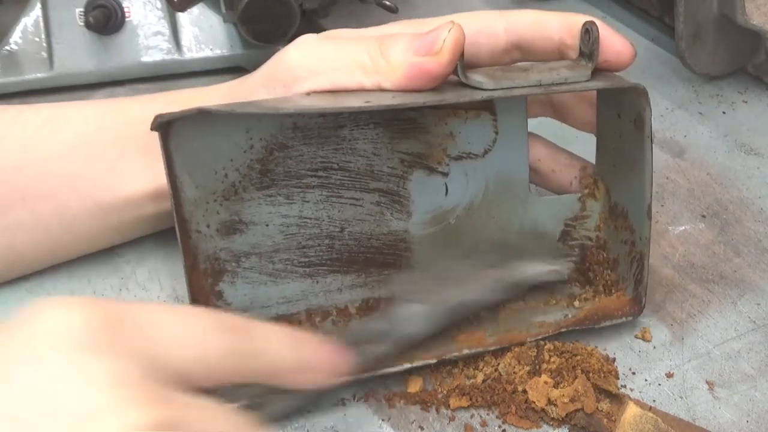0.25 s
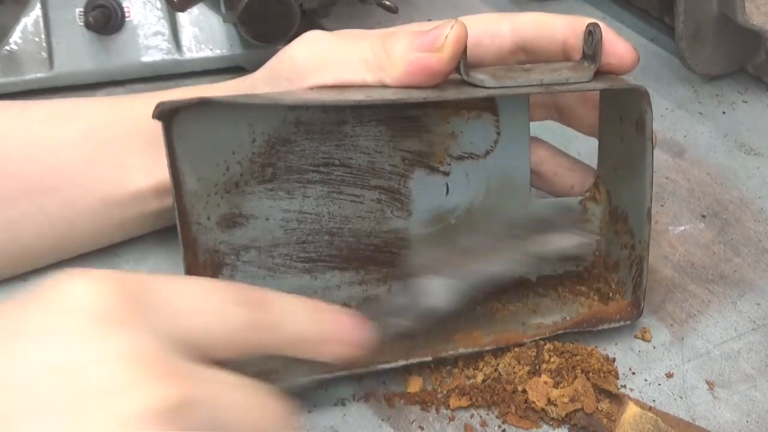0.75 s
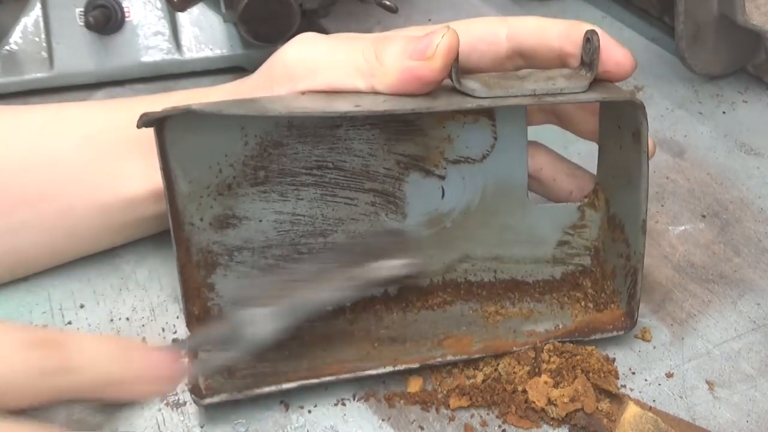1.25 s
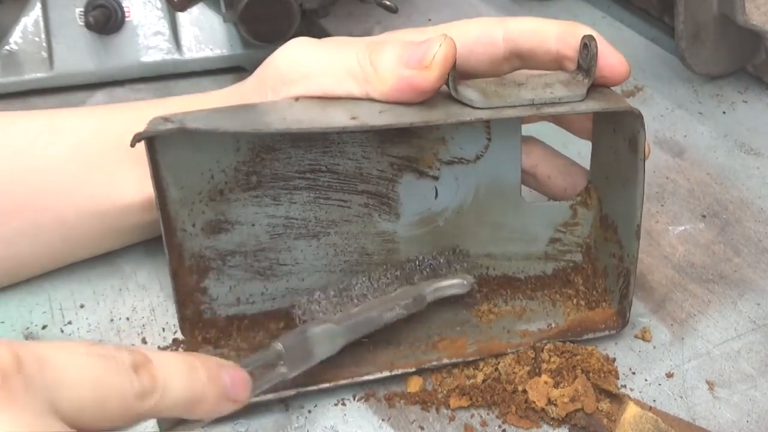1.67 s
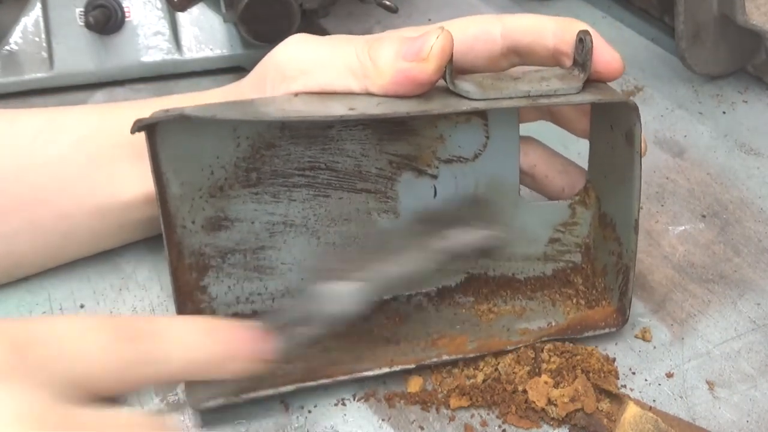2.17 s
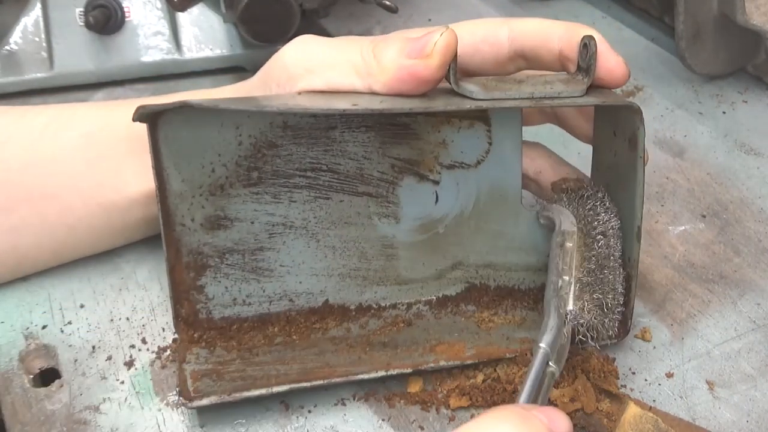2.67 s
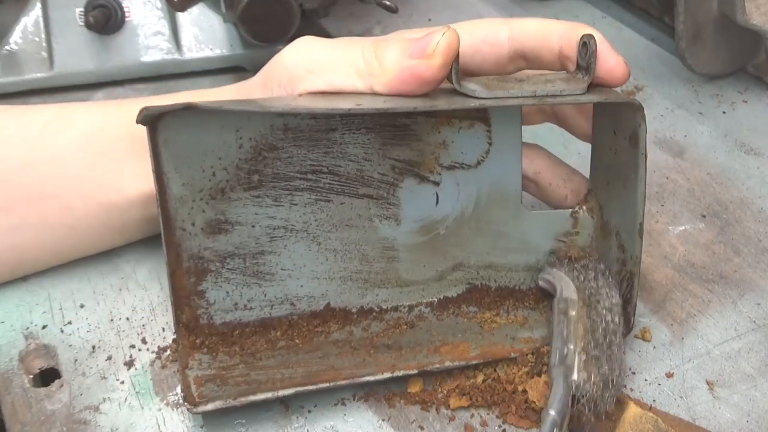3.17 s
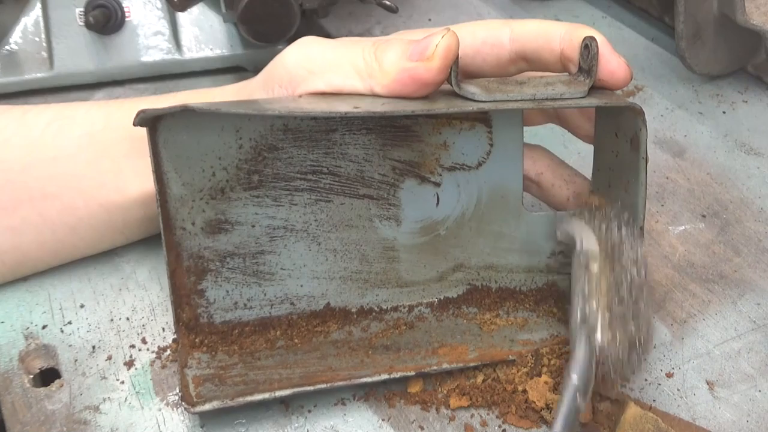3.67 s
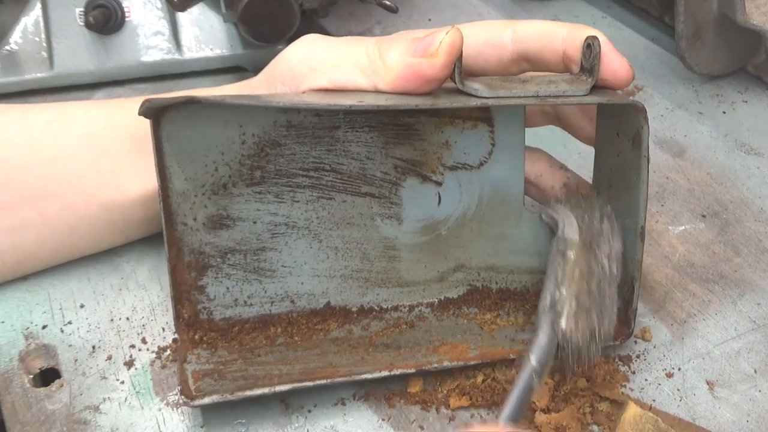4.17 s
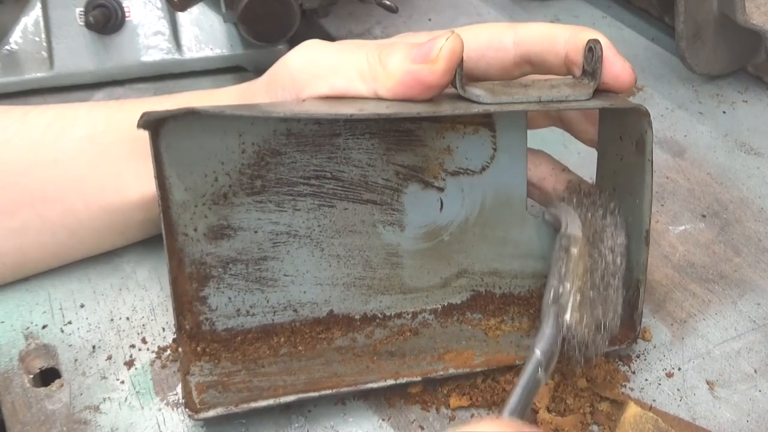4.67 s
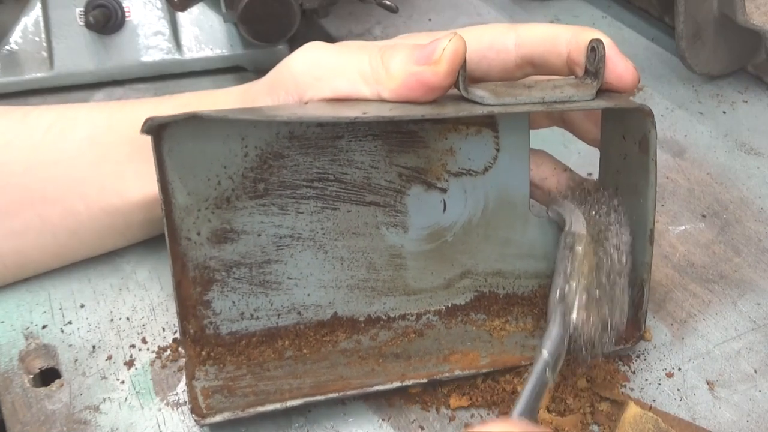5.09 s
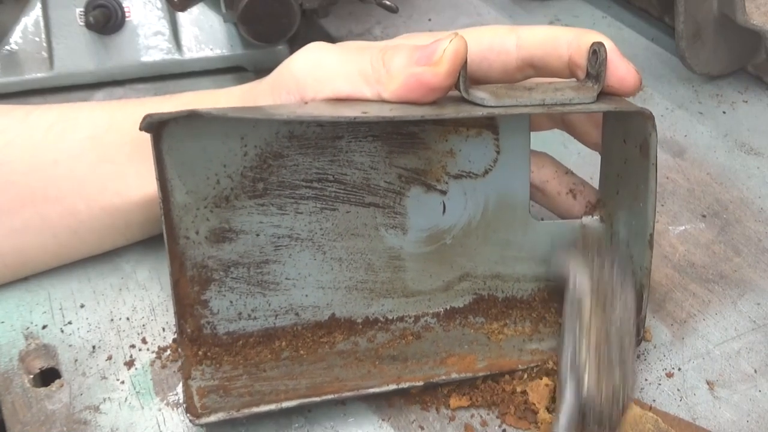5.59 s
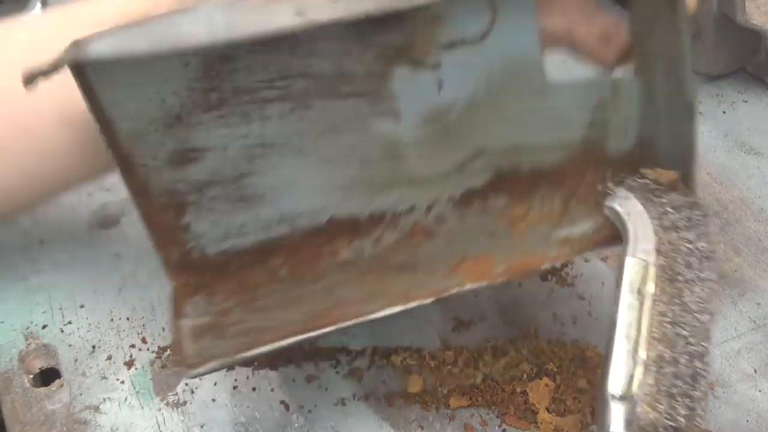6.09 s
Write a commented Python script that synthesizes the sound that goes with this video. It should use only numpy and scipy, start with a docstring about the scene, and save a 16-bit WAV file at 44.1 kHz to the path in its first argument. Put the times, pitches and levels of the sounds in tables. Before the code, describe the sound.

A wire brush scrubs rust off a small steel box in quick, ringing strokes, then the box is knocked on a bench.

```python
"""Wire-brushing a steel box

Close up at a workshop bench, a wire brush scrubs rust off a small hand-held sheet-steel box, first
along the long wall, then the short one. Each quick stroke is a shower of bristle slips that rings
the damped box. At the end the box is knocked out on the bench. The stereo microphone also picks up
short reflections, a faint low rumble and the air of the shop."""
import sys
import numpy as np
from scipy import signal
from scipy.fft import rfft, irfft
from scipy.io import wavfile
from scipy.ndimage import uniform_filter1d

SR = 44100
rng = np.random.default_rng(int(sys.argv[2]) if len(sys.argv) > 2 else 0)


def to_wav(sig):
    """Store sig (one row per channel, or 1-D mono) as 16-bit WAV at the path in sys.argv[1].

    Samples outside -1..1 are clipped; the rate is SR.
    """
    pcm = np.clip(np.atleast_2d(sig), -1, 1) * 32767
    pcm = np.round(pcm).astype(np.int16)
    wavfile.write(sys.argv[1], SR, pcm.T)  # frames by channels


N = 279594


def undb(db):
    return 10 ** (np.asarray(db) / 20)


def ring(x, hz, width):
    """One resonance with steep skirts; unit noise in gives about unit level out."""
    y = signal.lfilter(*signal.iirpeak(hz, hz / width, SR), x) / np.sqrt(np.pi * width / SR)
    return signal.lfilter(*signal.iirpeak(hz, hz / min(7 * width + 0.2 * hz, SR / 4), SR), y)


def band(x, lo_hz, hi_hz):
    """A band-pass; unit noise in gives about unit level out."""
    sos = signal.butter(3, [lo_hz, min(hi_hz, .45 * SR)], "bandpass", fs=SR, output="sos")
    return signal.sosfilt(sos, x) / np.sqrt(2 * (hi_hz - lo_hz) / SR)


def noise(envelope):
    """White noise that follows an envelope."""
    return envelope * rng.standard_normal(len(envelope))


def walk(rate):
    """Glides between random values, `rate` a second; spread near 1."""
    hold = int(SR / rate)
    return 1.15 * uniform_filter1d(np.repeat(rng.standard_normal(N // hold + 1), hold), hold)[:N]


def bursts(times, sizes, decay_s):
    """Sudden rises that die away exponentially."""
    age = np.arange(N) / SR - times[:, None]
    decay = np.exp(-np.maximum(age, 0) / np.reshape(decay_s, (-1, 1)))
    return np.sum(sizes[:, None] * (age >= 0) * decay, axis=0)


def wide(mid, side, share):
    """Left and right from a common and an opposed part."""
    return np.array([mid + share * side, mid - share * side])


# The air around the bench. Each row: frequency in Hz, relative spectral level in dB.
AIR_SPECTRUM = [(30, -8), (200, -22), (800, 0), (16000, -28)]


def shop_air(level_db=-80):
    """Faint, steady workshop air behind the work."""
    hz, db = np.transpose(AIR_SPECTRUM)
    gain = undb(np.interp(np.log(np.fft.rfftfreq(N, 1 / SR) + 1), np.log(hz), db))
    mid, side = irfft(rfft(rng.standard_normal((2, N))) * gain, N)
    air = wide(mid, side, 0.16)
    return air * undb(level_db) / np.sqrt(np.mean(air ** 2))


def add_reflections(direct, t60_s=.11, level_db=-13):
    """Bench and clutter near the microphone return dense, short reflections."""
    t = np.arange(SR // 4) / SR
    onset = np.clip(t / 0.0037 - 1, 0, 1)
    mid, side = rng.standard_normal((2, len(t))) * np.exp(-np.log(1000) * t / t60_s) * onset
    echo = wide(mid, side, 0.28)
    echo *= undb(level_db) / np.sqrt(np.sum(echo ** 2) / 2)
    return direct + signal.fftconvolve(direct.mean(axis=0, keepdims=True), echo, axes=1)[:, :N]


def low_rumble(force):
    """A faint low rumble that swells with each stroke and knock."""
    return wide(band(noise(force), 22, 224), band(noise(force), 22, 224), .45)


# The bench top's resonances. Each row: frequency in Hz, width in Hz, gain in dB.
BENCH_MODES = [(760, 260, -6), (1080, 250, -9), (1530, 420, -6), (2750, 300, -16), (9200, 5500, -19.5)]


def bench_top(blow, rattle):
    """The bench rings under a blow and its rattle; no mode is wider than a third of its frequency."""
    return sum(undb(db) * ring(blow + noise(rattle), hz, min(width, hz / 3))
               for hz, width, db in BENCH_MODES)


# The box hits the bench. Each row: start in seconds, force in dB, rattle decay in seconds.
BENCH_KNOCKS = [(5.945, -50, 0.0063), (6.181, -24.5, 0.0041), (6.259, -25.5, 0.0044),
                (6.266, -26.5, 0.0046), (6.331, -25, 0.0047)]


def knocks():
    """A sharp blow and a short rattle ring box and bench top; loosened rust patters down after."""
    start, db, rattle_s = np.transpose(BENCH_KNOCKS)
    rust = bursts(start, undb(db - 19), decay_s=0.026)
    force = (bursts(start, undb(db), rattle_s) + rust)[-SR // 2:]
    blow = np.zeros(len(force))
    blow[(start * SR).astype(int) - N] = undb(db - 5)
    blow = signal.lfilter([1], [1, -0.75], blow)  # contact lasts a fraction of a millisecond
    # a blunt blow favours the low modes, and the bench damps them
    box = sum(min(1, (1600 / hz) ** 0.78) * ring(noise(force), hz, 2 * width + 45)
              for hz, width, *_ in BOX_MODES)
    pan = undb([[-1.7], [1.7]])  # a little right of the microphone
    sound = pan * (undb(-17) * box + bench_top(blow, force)) + low_rumble(undb(-39.5) * force)
    return np.pad(sound, ((0, 0), (N - len(force), 0)))


def rust_flakes(per_second=160, level_db=-17, decay_s=0.0008):
    """Loose flakes crack off at random, also between strokes."""
    cracks = rng.random(N) < per_second / SR
    sizes = undb(level_db + 4 * np.minimum(rng.exponential(size=N), 3))
    return signal.lfilter([1], [1, -np.exp(-1 / (decay_s * SR))], cracks * sizes)


# Snags of the brush. Each row: start in seconds, relative force in dB.
TUFT_CATCHES = [(2.31, -28), (2.339, -24), (2.51, -39), (2.568, -31.5), (2.5845, -25.5), (2.6476, -33),
                (2.6632, -18.5), (2.6788, -15.5), (3.207, -12.5), (3.2201, -16.5), (3.537, -20),
                (3.847, -21), (4.032, -16.5), (4.056, -17.5), (4.193, -29), (4.445, -24), (4.806, -20.5),
                (4.845, -17), (5.181, -14.5), (5.437, -21.5), (5.472, -31.5), (5.506, -32), (5.803, -16),
                (5.992, -46.5), (6.069, -55.5)]


def tuft_catches():
    """Single bristle tufts catch and let go."""
    start, db = np.transpose(TUFT_CATCHES)
    return bursts(start, undb(db - 12), decay_s=0.0012)


def wire_slips(tuft_db, scatter_db=2):
    """Sizes of single wire slips, bunched as tufts of bristles pass over flakes; rms 1."""
    slipping = rng.random(N) < .3
    size = undb(scatter_db * np.minimum(rng.exponential(size=N), 4))
    slips = (slipping * size + 0.3) * undb(tuft_db)
    return slips / np.sqrt(np.mean(slips ** 2))


MOVES_S = [0.92, 2.45]  # the brush shifts from the rim to the long wall's foot, then to the short wall
# How the hand holds the brush. Each row: time in seconds, dip at the turn in dB, then wall flex,
# handle thud and bristle sizzle in dB relative to the main ring.
HAND_GRIP = [(0.0, 5, -10, -29.5, -5.5), (0.45, 7, -9.5, -29, -5.5), (0.58, 21, -5, -22.5, -7.5),
             (0.8, 8.5, -8, -27.5, -7), (1.1, 11.5, -3, -27, -5.5), (1.5, 14, -2.5, -25, -3),
             (2.0, 10.5, 0, -29, -6), (2.2, 8.5, -7.5, -30, -5.5), (2.33, 33, -5.5, -22.5, -8.5),
             (2.56, 50.5, -9.5, -16.5, -0.5), (2.64, 39, -19, -34, -15), (2.7, 8, -10, -19.5, -5.5),
             (2.76, 18, -6, -25, -6), (3.3, 16, -8, -21, -10), (3.43, 14, -3.5, -23, -8.5),
             (3.7, 21, -8.5, -19.5, -8), (4.12, 21, -6.5, -22, -4), (4.4, 18.5, -5, -20.5, -5.5),
             (5.35, 16, -7.5, -21.5, -5.5), (5.75, 25.5, -5.5, -23.5, -8.5), (5.871, 2.5, -5.5, -21, -3),
             (5.95, 10, -7, 0, -8), (6.1, 0.5, -5, -12, 2)]
# A pull compared with a push, at rim, foot and short wall. Each row: dip, flex, thud, sizzle in dB.
PULL_OVER_PUSH = [(-3.5, 6, 5, -2), (0.1, 5, 3.5, 0.5), (-3.7, 1.5, 4, 1)]
# The brush back bumps the wall. Each row: time in seconds, extra thud for that stroke in dB.
BRUSH_BUMPS = [(0.05, 5.5), (0.44, 6.5), (0.51, 1), (0.95, 7), (1.34, 4), (3.2, 0), (3.25, 5), (3.55, 4.5),
               (3.96, 5.5), (4.05, 6.5), (4.75, 3), (4.86, 0.5), (5.05, 3.5), (5.42, 5)]


def grip(start, peak_s, peak_db, pull):
    """The hand sets the dip before each stroke and the balance of the bands over time, in dB."""
    habits = np.array(PULL_OVER_PUSH)[np.searchsorted(MOVES_S, start)].T
    grip_s, *curves = np.transpose(HAND_GRIP)
    dip, flex, thud, sizzle = (np.interp(at, grip_s, curve) + (pull - .5) * habit
                               for at, curve, habit in zip([start] + 3 * [peak_s], curves, habits))
    bump_s, bump_db = np.transpose(BRUSH_BUMPS)
    thud += np.bincount(np.searchsorted(start, bump_s) - 1, bump_db, len(start))
    # a harder stroke than the usual -33 dB feeds the main ring most; the other bands lag
    excess = np.clip(peak_db + 33, -4, 4)
    balance = dict(thud=thud - 0.66 * excess, flex=flex - 0.85 * excess, sizzle=sizzle - 0.79 * excess)
    colour_db = {name: np.interp(np.arange(N) / SR, peak_s, db) for name, db in balance.items()}
    return np.maximum(dip, 0), dict(colour_db, ring=0)


# Pushes and pulls in turn. Each row: start in seconds, place of the peak as a share of the stroke,
# peak drive in dB. The last row ends the brushing.
BRUSH_STROKES = [(0.0, 0.27, -32.5), (0.033, 0.42, -32.5), (0.085, 0.39, -34.5), (0.129, 0.2, -30.5),
                 (0.187, 0.73, -31), (0.252, 0.32, -31.5), (0.284, 0.56, -32.5), (0.335, 0.42, -30.5),
                 (0.388, .28, -33.5), (0.429, 0.56, -33), (0.492, 0.16, -34.5), (0.545, 0.7, -36.5),
                 (0.589, 0.46, -34.5), (0.641, 0.61, -36), (0.683, 0.47, -37), (0.728, 0.84, -32.5),
                 (0.775, 0.17, -33.5), (0.827, 0.48, -34), (0.878, 0.22, -36), (0.925, 0.5, -34.5),
                 (0.982, 0.32, -32.5), (1.027, 0.4, -31), (1.081, 0.54, -31.5), (1.129, 0.62, -31),
                 (1.18, 0.37, -34), (1.23, 0.65, -32.5), (1.277, 0.46, -32.5), (1.326, 0.7, -33),
                 (1.378, 0.7, -31.5), (1.429, 0.81, -31.5), (1.479, 0.55, -32), (1.531, 0.67, -34),
                 (1.581, 0.31, -33.5), (1.631, 0.66, -32.5), (1.678, 0.61, -32), (1.728, 0.7, -32.5),
                 (1.781, 0.65, -30.5), (1.834, 0.57, -33.5), (1.887, 0.42, -30), (1.94, 0.72, -32),
                 (1.989, 0.56, -32), (2.042, 0.76, -33.5), (2.089, 0.6, -32), (2.155, 0.58, -35),
                 (2.196, 0.27, -32.5), (2.25, 0.31, -39.5), (2.329, 0.097, -42.5), (2.375, .17, -100),
                 (2.492, 0.44, -54.5), (2.549, 0.46, -50), (2.634, 1, -43), (2.699, 0.089, -38),
                 (2.749, 0.7, -41), (2.816, 0.34, -30), (2.867, 0.74, -38.5), (2.913, 0.52, -32),
                 (2.966, 0.15, -40.5), (3.001, 0.5, -34.5), (3.059, 0.86, -36.5), (3.09, 0.35, -35.5),
                 (3.151, 0.5, -32), (3.183, 0.42, -33.5), (3.229, 0.52, -32.5), (3.27, 0.31, -30),
                 (3.315, 0.55, -32.5), (3.356, 0.28, -30), (3.395, 0.65, -32), (3.44, 0.44, -31),
                 (3.475, 0.53, -35.5), (3.53, 0.57, -33.5), (3.566, 0.62, -39.5), (3.615, 0.49, -30.5),
                 (3.662, 0.57, -41), (3.71, 0.39, -31.5), (3.763, 0.52, -35), (3.819, 0.23, -30.5),
                 (3.868, 0.75, -34.5), (3.922, 0.59, -33), (3.978, 0.64, -36.5), (4.02, .55, -41),
                 (4.088, .32, -47), (4.118, 0.3, -43), (4.177, 0.67, -38.5), (4.224, 0.44, -30.5),
                 (4.292, 0.75, -33.5), (4.338, 0.32, -34.5), (4.398, 0.3, -33), (4.435, 0.6, -31),
                 (4.494, 0.75, -37), (4.537, 0.41, -30), (4.592, 0.48, -33.5), (4.634, 0.46, -28.5),
                 (4.691, 0.43, -34), (4.74, 0.37, -30), (4.794, 0.74, -33), (4.834, 0.7, -32.5),
                 (4.886, 0.24, -35.5), (4.934, 0.34, -30), (4.987, 0.56, -38), (5.022, 0.55, -31.5),
                 (5.08, 0.49, -34), (5.118, 0.48, -29), (5.168, 0.74, -36.5), (5.205, 0.6, -30.5),
                 (5.258, 0.29, -34), (5.293, 0.47, -32), (5.347, 0.43, -34.5), (5.387, 0.63, -37),
                 (5.43, .12, -50.5), (5.489, 0.63, -34.5), (5.569, 0.68, -30), (5.615, 0.33, -37.5),
                 (5.661, 0.76, -31), (5.712, 0.46, -31), (5.76, 0.6, -30.5), (5.797, 0.24, -33),
                 (5.866, 0.15, -59), (5.935, 0.13, -71.5), (6.032, .6, -90), (6.081, 0.44, -66.5),
                 (6.17, 0.36, -102)]


def strokes(flip_delay_s=0.0095, flip_db=-4, flip_decay_s=0.003):
    """The brush speeds up from each turn, its bristles flip over, and it slows into the next."""
    start, peak_at, peak_db = np.transpose(BRUSH_STROKES)
    peak_at = np.clip(peak_at, .05, .95)
    peak_s = start + peak_at * np.diff(start, append=start[-1])
    pull = np.arange(len(start)) % 2
    dip_db, colour_db = grip(start, peak_s, peak_db, pull)
    turn_db = np.minimum(peak_db, np.r_[peak_db[0], peak_db[:-1]]) - dip_db
    t = np.arange(N) / SR
    k = np.clip(np.searchsorted(start, t, "right") - 1, 0, len(start) - 2)  # current stroke
    progress = np.clip((t - start[k]) / (start[k + 1] - start[k]), 0, 1)
    reach = np.where(pull[k], progress, 1 - progress)  # 0 at the wall's near end, 1 at the far end
    # the bristles linger at each turn; strokes hold their speed longer on the long wall
    before = np.sin(np.pi / 2 * np.maximum(1 - progress / peak_at[k], 0))
    after = np.sin(np.pi / 2 * np.maximum((progress - peak_at[k]) / (1 - peak_at[k]), 0))
    long_wall = t <= MOVES_S[1]
    rise_db = before ** np.where(long_wall, 6.5, 4.96) * (turn_db[k] - peak_db[k])
    fall_db = after ** np.where(long_wall, 4.5, 3.19) * (turn_db[k + 1] - peak_db[k])
    flip_age = t - start[k] - flip_delay_s
    flip_size = undb(flip_db + 3 * rng.standard_normal(len(start)))
    flip = flip_size[k] * (flip_age > 0) * np.exp(-np.abs(flip_age) / flip_decay_s)
    drive = undb(peak_db[k]) * (undb(rise_db + fall_db) + flip + rust_flakes()) * (t < start[-1])
    return drive, progress, reach, colour_db


# The steel box's resonances. Each row: frequency in Hz, width in Hz, then relative strength in dB
# when brushed at the rim, at the foot of the long wall and on the short wall.
BOX_MODES = [(370, 60, -46, -46, -38), (538, 24, -36, -35, -29), (670, 110, -42, -40, -34),
             (785.5, 29.7, -33.5, -26, -30.5), (1040, 90, -38, -36, -36), (1244, 24, -43, -32.5, -37),
             (1510, 90, -28, -28, -25), (1650, 100, -28, -28, -25), (2145, 60, -36, -57.5, -19),
             (2534, 142, -11.5, -8, -10), (2715, 90, -12, 1, -14), (2810, 70, -16, -3, -16),
             (2960, 350, -12, -3.5, -14), (3536, 200, -20.5, -26, -11), (3764, 37.6, -10, -2, -17.5),
             (4286, 61, -20, -14, -22.5), (4950, 86, -18.5, -5, -23), (5303, 80, -22.5, -11.5, -19),
             (6400, 160, -14.5, -18, -10.5), (6900, 128.3, -2.5, -3, 0.5), (7230, 200, -12, -12, -12),
             (7785, 140, -8, -1.5, -10.5), (7843, 55, -6.5, -4, -35), (8710, 98, -20, -16, -17.5),
             (8940, 200, -26.5, -21.5, -24), (9350, 35, -12.5, -17, -20), (10070, 140, -16.5, -14, -14),
             (10140, 130, -19.5, -12, -10), (10720, 65, -25, -7.5, -13.5), (11000, 73, -13, -22, -15),
             (11560, 78, -15.5, -15, -21), (11940, 150, -9, -10.5, -12), (12580, 85, -11, -19, -18),
             (13500, 130, -30, -30, -20), (15100, 700, -14, -17, -16.5)]


def box_ring(force, signs, lo_hz, hi_hz, zone, far_db, flicker_db, stereo, near_end_hz=3766):
    """Every slip strikes its own spot, so it drives each mode with its own strength and sign."""
    modes = np.array([mode for mode in BOX_MODES if lo_hz <= mode[0] < hi_hz])
    shares_db = modes[:, 2:] - 10 * np.log10(np.sum(undb(2 * modes[:, 2:]), axis=0))
    sound = 0
    for (hz, width), share_db in zip(modes[:, :2], shares_db):
        lean_db = -far_db if abs(hz - near_end_hz) < 2 * width else far_db
        coupling = undb(share_db[zone] + lean_db + flicker_db * walk(25))  # the contact point moves
        tone = ring(force * coupling * np.roll(signs, int(hz)), hz, width)
        quadrature = np.gradient(tone) / np.sin(2 * np.pi * hz / SR)
        sound += wide(tone, quadrature * rng.choice([-1, 1]), stereo)
    return sound


# The bands of the scrubbing. Each row: name, low and high edge in Hz, then in dB the dry scratch,
# swell as the bristles dig in, band flicker and mode flicker, and last the modes' stereo side share.
BRUSH_BANDS = [("thud", 336.6, 2050, -7, 7.3, 2.5, 4.0, .33), ("flex", 1700, 5700, -20, 2.1, 1.5, 3.5, .15),
               ("ring", 5700, 9000, -34.5, -2, 0.8, 2.4, .08),
               ("sizzle", 9000, 15800, -7.5, 0.99, 1.5, 2.8, .15)]


def wire_brush():
    """Close to the microphone, showers of slipping wires scratch the steel and ring the box."""
    drive, progress, reach, colour_db = strokes()
    catches = tuft_catches()
    tufts, signs = walk(150), rng.standard_normal(N)
    zone = np.searchsorted(MOVES_S, np.arange(N) / SR)
    long_wall = zone < 2
    uneven = np.where(long_wall, .5, .8)  # the short strokes stumble over thicker flakes
    sound = 0
    for name, lo, hi, scratch_db, swell_db, flicker_db, mode_flicker_db, stereo in BRUSH_BANDS:
        slips = wire_slips(tuft_db=uneven * (tufts + 1.5 * walk(90)))
        # along the long wall the handle thuds early in a stroke, on the short wall late
        slope_db = swell_db * np.where(long_wall & (name == "thud"), -1, 1)
        pressure = undb(slope_db * (progress - .5) + flicker_db * walk(40) - 4)
        force = (pressure * drive * slips + catches) * undb(colour_db[name])
        mid, side = (band(noise(force), lo, hi) for _ in range(2))
        sound += undb(scratch_db) * wide(mid, side, .42)
        # the long wall's flex modes wake toward its far end, those around near_end_hz the other way
        far_db = 9 * (reach - .5) * long_wall * (name == "flex")
        sound += box_ring(force, signs, lo, hi, zone, far_db, mode_flicker_db, stereo)
    return sound + low_rumble(undb(-41.5) * drive * undb(colour_db["thud"] / 2))


def scene():
    """Brushing and knocks, heard from beside the bench in a quiet shop."""
    return add_reflections(wire_brush() + knocks()) + shop_air()


def record(dry):
    """The microphone is flat up to a steep top edge at 15680 Hz."""
    return signal.sosfilt(signal.ellip(10, .2, 75, 15680, fs=SR, output="sos"), dry)


dry = scene()
out = record(dry)
to_wav(out)
```